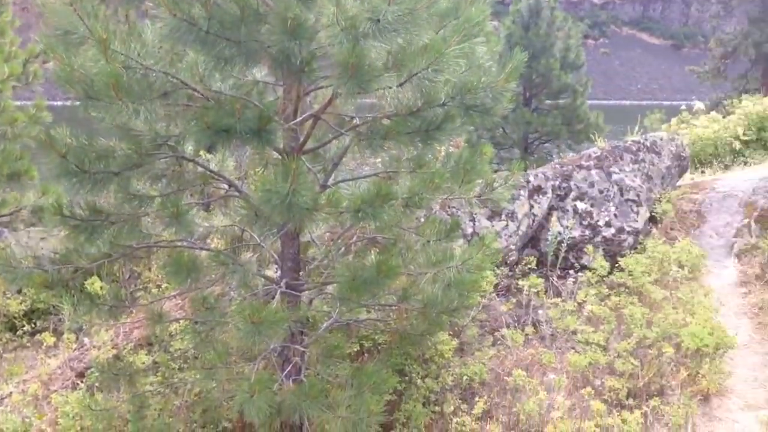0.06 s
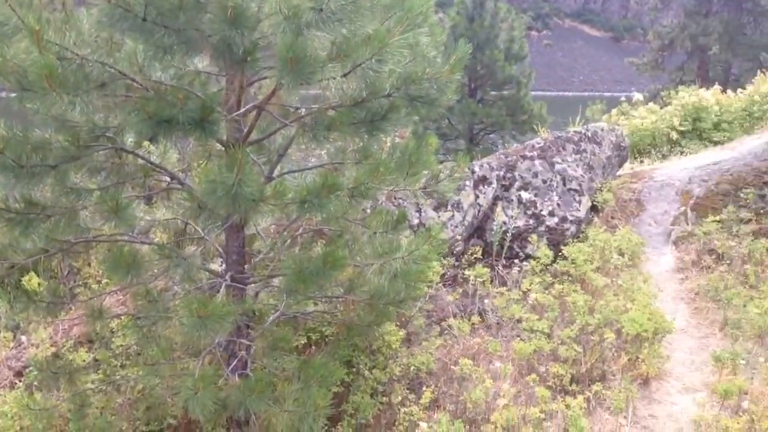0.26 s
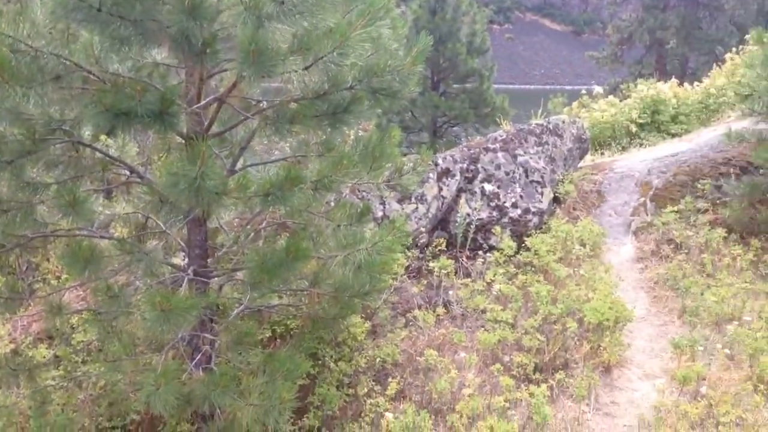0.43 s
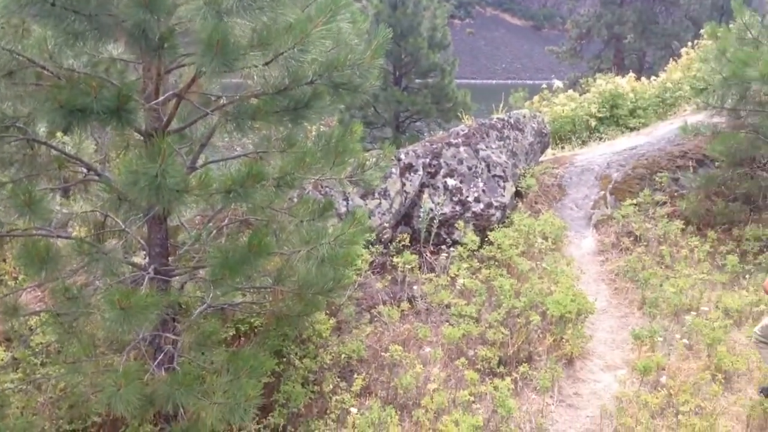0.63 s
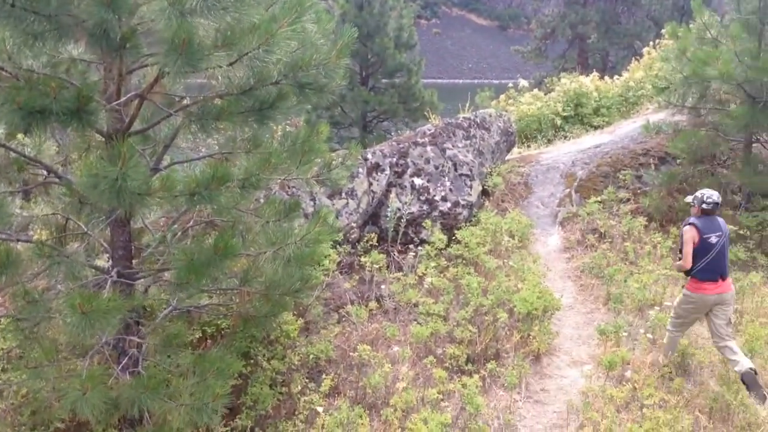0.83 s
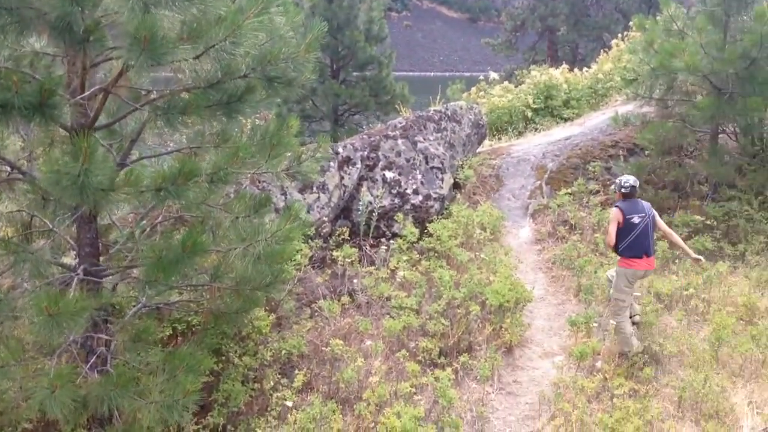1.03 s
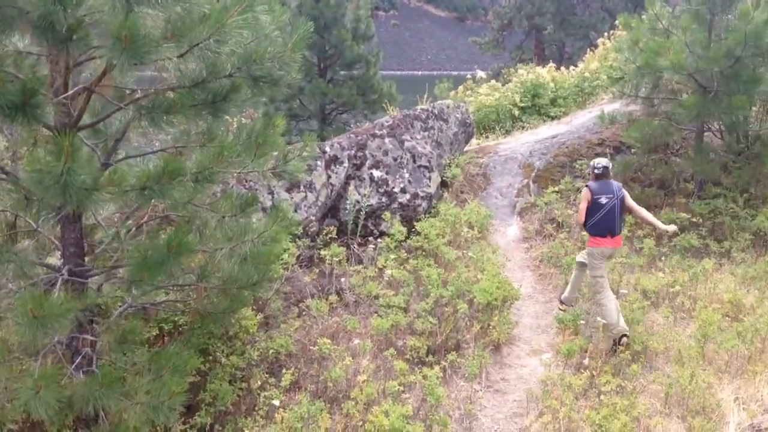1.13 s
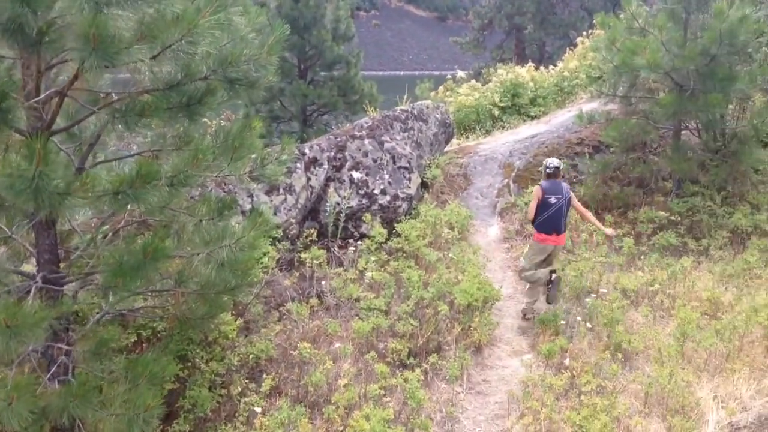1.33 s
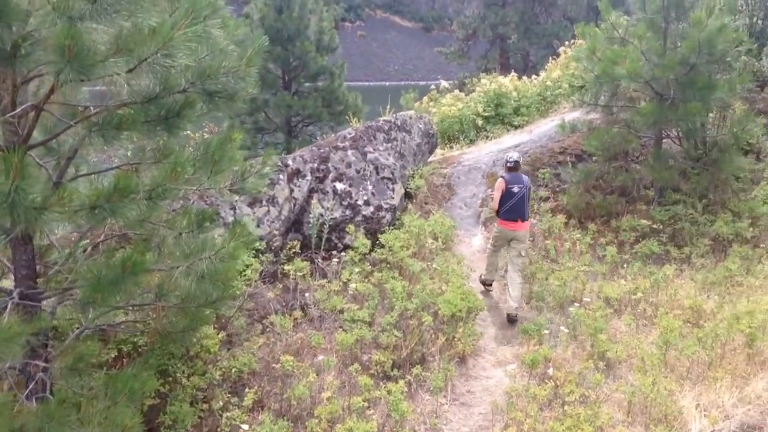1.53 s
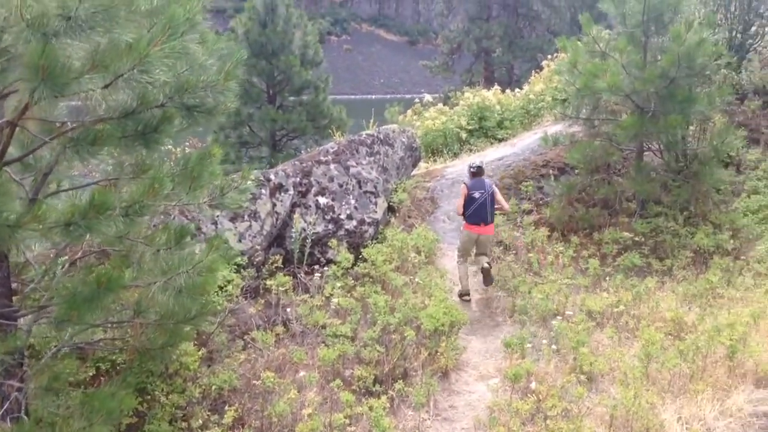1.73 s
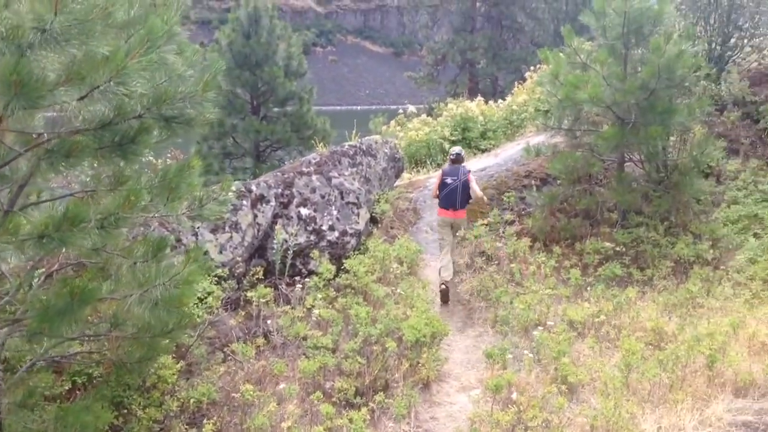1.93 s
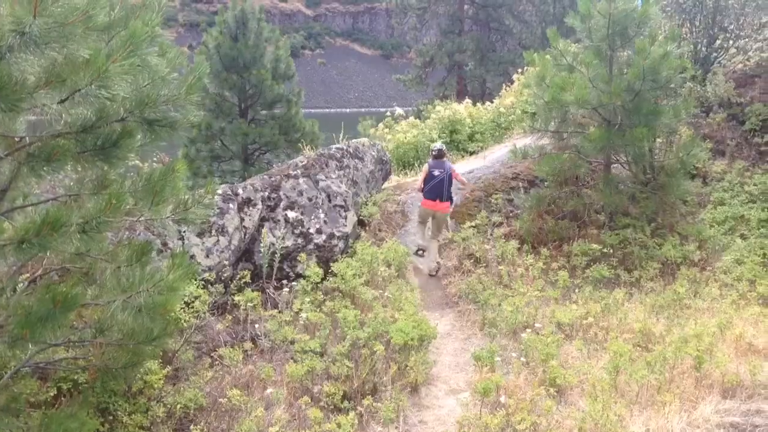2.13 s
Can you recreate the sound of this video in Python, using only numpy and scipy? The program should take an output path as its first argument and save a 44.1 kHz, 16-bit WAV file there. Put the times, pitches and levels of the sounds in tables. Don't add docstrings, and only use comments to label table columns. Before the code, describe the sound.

A runner's footsteps go by outdoors on a dirt trail in open pine woods, heard on a handheld camera's mono microphone: fluttering low wind thuds first, then grass swishes, grit and pebble clicks, fading away.

```python
import sys
import numpy as np
from scipy import signal
from scipy.fft import rfft, irfft, next_fast_len
from scipy.io import wavfile
from scipy.ndimage import map_coordinates

SR = 44100
rng = np.random.default_rng(int(sys.argv[2]) if len(sys.argv) > 2 else 0)


def invert_db(level):
    return 10 ** (np.asarray(level, dtype=float) / 20)


def store_pcm(level_fs):
    pcm = np.round(np.clip(level_fs, -1, 1) * 32767).astype(np.int16)
    wavfile.write(sys.argv[1], SR, np.atleast_2d(pcm).T)


N = 95961

# pitch_hz, level_db
FOREST_COLOUR = [(24, -26), (70, -9), (300, .5), (900, -6), (1300, -10), (1700, -7), (3000, -10),
                 (5000, -9), (15100, -14)]
# time_s, level_db
WIND_STRENGTH = [(0, -39), (.07, -42), (.19, -47), (.28, -46), (.45, -43), (.6, -46), (.79, -50),
                 (.87, -62), (.95, -66), (1.05, -54), (1.33, -51), (1.42, -55), (1.5, -55), (1.65, -57),
                 (1.75, -67), (1.9, -82), (2.18, -82)]
# pitch_hz, level_db
RUMBLE_COLOUR = [(15, -42), (30, -11), (62, 2.5), (110, -1), (240, -17), (350, -36), (700, -120)]
# pitch_hz, level_db
FLUTTER_COLOUR = [(120, -30), (270, 0), (450, -7), (650, -22), (820, -40), (1500, -120)]
# centre_s, level_db, spread_s
FLUTTER_BURSTS = [(.03, -42, .012), (.046, -46, .005), (.114, -41, .009), (.132, -41, .006),
                  (.228, -58, .008), (.298, -44, .004), (.374, -48, .006), (.404, -44, .006),
                  (.44, -44, .015), (.49, -54, .012), (.516, -48, .005), (.56, -45, .005),
                  (.582, -55, .005), (.602, -54, .005), (.65, -53, .005), (.735, -63, .008),
                  (1.231, -66, .005), (1.355, -60, .01), (1.505, -64, .01)]
# centre_s, level_db, pitch_hz, length_s
PULLS = [(.021, -34, 230, .008), (.031, -39, 560, .009), (.038, -35, 150, .009), (.05, -30, 95, .013),
         (.079, -35, 120, .011), (.093, -31, 115, .011), (.111, -29, 140, .009), (.1215, -34, 200, .008),
         (.131, -39, 500, .011), (.1333, -36, 200, .008), (.2, -41, 95, .016), (.226, -40, 100, .01),
         (.2437, -35, 125, .02), (.272, -37, 100, .013), (.2986, -31, 185, .009), (.342, -39, 105, .012),
         (.3729, -27, 165, .009), (.3951, -35, 130, .011), (.4041, -28, 140, .009), (.4214, -34, 100, .01),
         (.4342, -27, 125, .009), (.4536, -27, 178, .017), (.4826, -36, 120, .012), (.4918, -32, 116, .01),
         (.5159, -28.5, 170, .009), (.5377, -35, 130, .01), (.5585, -33, 170, .008),
         (.6019, -33, 190, .008), (.6331, -38, 106, .013), (.65, -35, 123, .009), (.6729, -39, 110, .014),
         (.701, -41, 100, .011), (.7342, -39, 165, .014), (.752, -44, 75, .015), (.818, -44, 105, .012),
         (.85, -55, 120, .015), (.888, -55, 154, .011), (.97, -60, 100, .02), (1.024, -49, 83, .014),
         (1.0717, -39, 77, .026), (1.175, -50, 100, .012), (1.2487, -46, 150, .011),
         (1.2943, -45, 120, .02), (1.322, -46, 70, .015), (1.355, -46, 90, .013), (1.43, -53, 140, .02),
         (1.642, -49, 85, .011), (1.695, -55, 255, .016), (1.822, -57, 89, .019), (2.0273, -48, 155, .017)]
# centre_s, level_db, pitch_hz, length_s
PUSHES_OUT = [
    (.1472, -33, 125, .009),
    (.17, -40, 80, .012),
    (.1145, -29.5, 150, .008),
    (.4612, -31, 95, .009),
    (.5765, -33, 85, .014),
    (1.141, -37.5, 80, .011),
    (1.2317, -37, 120, .009),
    (1.5029, -40, 100, .012),
]
# pitch_hz, width_hz, level_db
PACK_RESONANCES = [(1700, 300, -1), (2000, 200, -4), (2620, 150, 1.5)]
# time_s, level_db
PACK_CLOSENESS = [(0, -80), (.45, -76), (1.0, -73), (1.25, -75), (1.55, -72), (1.75, -78), (2.18, -81)]
# start_s, peak_db, pitch_hz, t60_s, overtones_db
PEBBLE_HITS = [(.095, -53, 1300, .015, -3), (.106, -40, 1480, .03, -15), (.11, -42, 1090, .025, -10),
               (.112, -44, 4900, .015, -15), (.117, -48, 2500, .01, -8), (.236, -52, 830, .03, -6),
               (.523, -50, 1500, .015, 0), (.539, -47, 1300, .015, 0), (.743, -41, 1650, .018, -6),
               (.753, -47, 1450, .02, -6), (.774, -41, 2000, .015, -3), (.810, -43, 950, .02, 0),
               (.852, -44, 1250, .02, -3), (.870, -41, 1100, .008, 0), (.95, -54, 850, .02, 0),
               (.992, -46, 850, .025, -6), (1.029, -47, 1500, .012, 3), (1.18, -53, 1750, .04, -15),
               (1.27, -48, 1500, .009, -10), (1.3318, -25.5, 960, .011, -1), (1.332, -36, 1300, .012, -12),
               (1.335, -42, 1650, .025, -10), (1.564, -53, 4500, .006, 0), (1.589, -52, 2560, .025, -4),
               (1.59, -49, 1800, .02, 0), (1.685, -47, 2150, .015, -8), (1.686, -49, 800, .015, -3),
               (1.689, -47, 1030, .015, 0), (1.6875, -51, 4700, .012, 0), (1.692, -48, 1900, .015, -10),
               (1.81, -60, 1100, .02, -5), (2.0147, -41, 1000, .013, -8), (2.015, -49, 2090, .015, -10),
               (2.018, -52, 1600, .015, -8), (2.033, -49, 1600, .025, -12), (2.054, -49, 10300, .012, 10),
               (2.056, -60, 5600, .03, -20)]
# pitch_ratio, level_db, share_of_t60
PEBBLE_OVERTONES = [(1.7, -5, .8), (4.35, -8, .4), (7.2, -12, .35)]
# peak_s, grass_db, grit_over_grass_db, rise_s, fall_s (both per 10 dB)
STRIDES = [(.10, -63, -5, .09, .06), (.113, -48, -5, .007, .006), (.238, -72, 12, .006, .008),
           (.345, -65, -8, .03, .04), (.45, -63, -12, .12, .06), (.53, -53, -9, .045, .02),
           (.655, -60, -12, .03, .07), (.775, -53, -9, .05, .04), (.8, -53.5, -13, .03, .05),
           (.855, -57, -11, .03, .04), (.89, -50, -3, .022, .022), (.975, -59, -2, .01, .04),
           (.995, -65, 7, .012, .015), (1.043, -49.5, -9, .02, .035), (1.10, -54, -8, .04, .04),
           (1.14, -59, -9, .03, .04), (1.2, -64, -3, .04, .06), (1.335, -58, -2, .017, .04),
           (1.62, -67, -3, .06, .08), (1.688, -57.5, 4, .008, .009), (1.92, -68, -6, .017, .015),
           (2.016, -65, 1, .005, .025), (2.034, -64, -3, .006, .012)]
# pitch_hz, level_db
GRASS_COLOUR = [(1500, -35), (2900, -11), (4200, 0), (5400, .3), (7700, -3.5), (12700, -7), (15100, -12)]
# pitch_hz, level_db
STRIKE_COLOUR = [(2000, -30), (4800, 0), (8000, -10), (15100, -26)]
# pitch_hz, level_db
GRIT_COLOUR = [(210, -35), (450, -9), (970, -1), (1330, -4), (1890, .3), (2900, -11), (4200, -35),
               (7000, -120)]


def unit(x):
    return x / np.sqrt(np.mean(x ** 2) + 1e-20)


def curve(rows):
    s, level_db = np.transpose(rows)
    return np.interp(np.arange(N) / SR, s, level_db)


def wobble(rate):
    knot = np.clip(np.arange(N) * rate / SR, 0, 398)
    return map_coordinates(rng.standard_normal(400), [knot])


def filtered(x, response):
    size = next_fast_len(N + SR // 2)
    spectrum = rfft(x, size) * response(np.fft.rfftfreq(size, 1 / SR))
    return irfft(spectrum, size)[:N]


def coloured(x, points):
    f, level_db = np.transpose(points)
    return unit(filtered(x, lambda hz: invert_db(np.interp(np.log(hz + 1), np.log(f + 1), level_db))))


def grains(count, spread_db):
    smooth_share = .4
    hit = rng.random(N) < count / SR
    size = invert_db(spread_db * np.clip(rng.standard_normal(N), -2, 2))
    clicks = hit * rng.choice([-1, 1], N) * size
    return np.sqrt(1 - smooth_share) * unit(clicks) + np.sqrt(smooth_share) * rng.standard_normal(N)


def forest():
    return invert_db(-65 + .6 * wobble(6)) * coloured(rng.standard_normal(N), FOREST_COLOUR)


def wind():
    lump_rate = 30
    t = np.arange(N) / SR
    strength_db = curve(WIND_STRENGTH)
    rumble = coloured(rng.standard_normal(N), RUMBLE_COLOUR) * invert_db(strength_db + 4 * wobble(lump_rate))
    s, level_db, spread = np.transpose(FLUTTER_BURSTS)[:, :, None]
    bursts = (invert_db(level_db) * np.exp(-.5 * ((t - s) / spread) ** 2)).sum(0)
    bed = invert_db(strength_db - 27)
    flutter = coloured(rng.standard_normal(N), FLUTTER_COLOUR) * invert_db(1.5 * wobble(2 * lump_rate))
    return rumble + flutter * (bursts + bed)


def puffs():
    stretch, shortest_s, gain_db, edge_db = .55, .0065, 1.5, -17
    out, t = np.zeros(N), np.arange(N) / SR
    drift = .4 * wobble(45)
    for side, rows in ((-1, PULLS), (1, PUSHES_OUT)):
        for s, level_db, hz, length in rows:
            u = t - s
            spread = stretch * np.sqrt(abs(length ** 2 - shortest_s ** 2) + 1e-6)
            phase = 2 * np.pi * hz * u + drift - drift[round(s * SR)]
            swing = np.cos(phase) + invert_db(edge_db) * np.cos(2 * phase)
            out += side * invert_db(level_db + gain_db) * swing * np.exp(-.5 * (u / spread) ** 2)
    return out


def trees(x):
    echo_t60, first_return_s = .07, .003
    t = np.arange(SR // 10) / SR
    tail = rng.standard_normal(len(t)) * invert_db(-60 * t / echo_t60) * (t > first_return_s)
    return signal.fftconvolve(x, tail / np.linalg.norm(tail))[:N]


def pack():
    def body(f):
        total = 0
        for k, (centre, width, level_db) in enumerate(PACK_RESONANCES):
            resonance = 1j * f * width / (centre ** 2 - f ** 2 + 1j * f * width)
            total = total + (-1) ** k * invert_db(level_db) * resonance
        return total

    rattle = unit(filtered(grains(count=600, spread_db=3), body))
    return rattle * invert_db(curve(PACK_CLOSENESS) + 2.5 * wobble(40))


def pebbles():
    attack_s, crack_db, crack_t60 = .0006, -17, .006
    out, t = np.zeros(N + SR), np.arange(SR // 10) / SR
    for s, peak_db, hz, t60, bright_db in PEBBLE_HITS:
        ring = invert_db(-60 * t / t60) * np.sin(2 * np.pi * hz * t)
        for ratio, level_db, share in PEBBLE_OVERTONES:
            over_hz = hz * ratio * (1 + .02 * rng.standard_normal())
            over_db = bright_db + level_db + 1.5 * rng.standard_normal()
            if 2 * over_hz < SR:
                ring += invert_db(over_db - 60 * t / (share * t60)) * np.sin(2 * np.pi * over_hz * t)
        ring += invert_db(bright_db + crack_db - 60 * t / crack_t60) * rng.standard_normal(len(t))
        out[round(s * SR):][:len(t)] += invert_db(peak_db) * ring * (1 - np.exp(-t / attack_s))
    return out[:N]


def strides():
    clump_db, clump_rate = 1.6, 130
    t = np.arange(N) / SR
    s, grass_db, grit_db, rise, fall = np.transpose(STRIDES)[:, :, None]
    drop_db = 10 * np.where(t < s, (s - t) / rise, (t - s) / fall)
    power = invert_db(2 * (grass_db - drop_db))
    sudden = rise < .016
    grass = coloured(grains(count=9000, spread_db=4), GRASS_COLOUR)
    strike = coloured(grains(count=9000, spread_db=4), STRIKE_COLOUR)
    grit = coloured(grains(count=1500, spread_db=5), GRIT_COLOUR) * invert_db(clump_db * wobble(clump_rate))
    hiss = np.sqrt((power * ~sudden).sum(0)) * grass + np.sqrt((power * sudden).sum(0)) * strike
    crunch = np.sqrt((power * invert_db(2 * grit_db)).sum(0)) * grit
    return hiss * invert_db(clump_db * wobble(clump_rate)) + crunch


def scene():
    stones = pebbles()
    background = forest() + wind() + puffs()
    runner = pack() + stones + invert_db(-23) * trees(stones) + strides()
    return (background + runner)[None]


def band_limit(x):
    return signal.sosfilt(signal.butter(12, 15280, fs=SR, output="sos"), x)


def record(dry):
    mix = filtered(dry[0], lambda hz: hz < 15300)[None]
    return band_limit(mix)


dry = scene()
out = record(dry)
store_pcm(out)
```